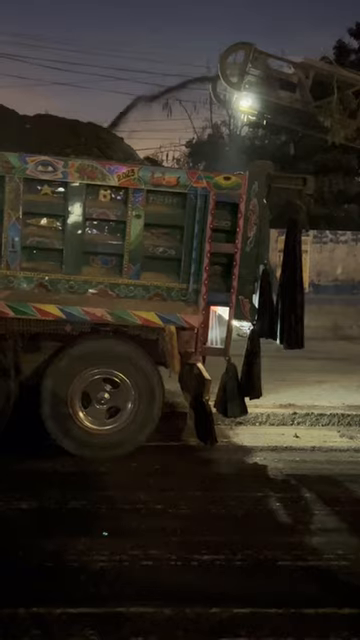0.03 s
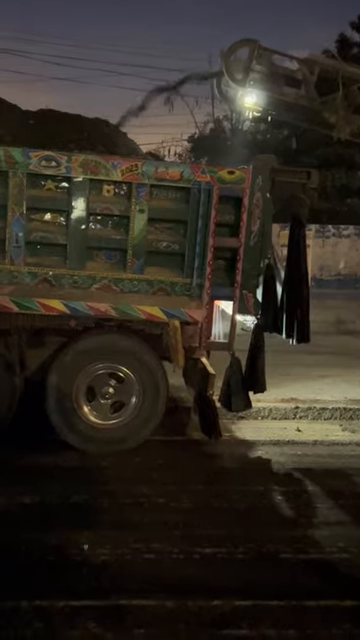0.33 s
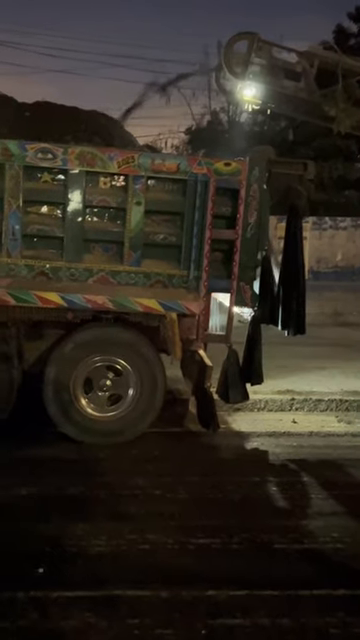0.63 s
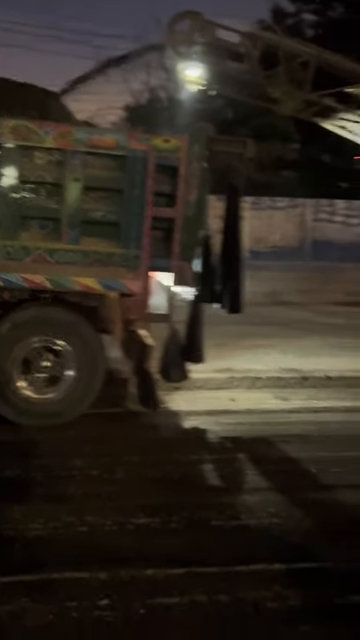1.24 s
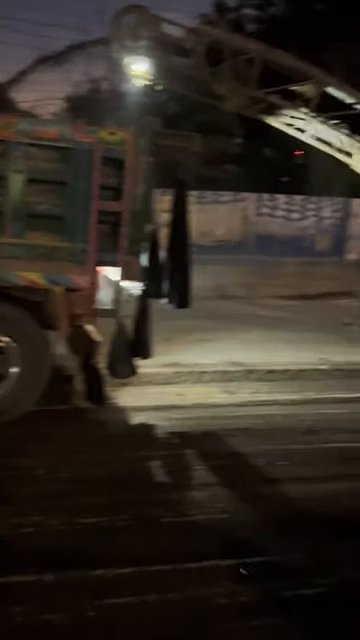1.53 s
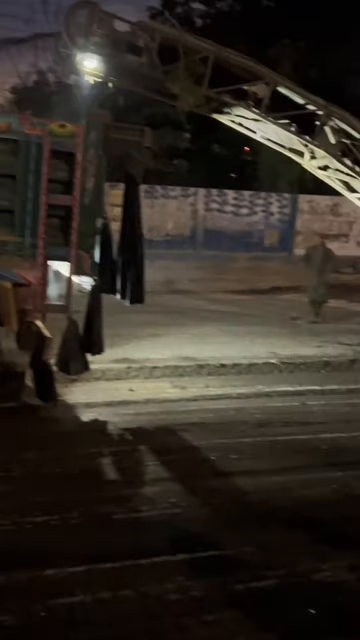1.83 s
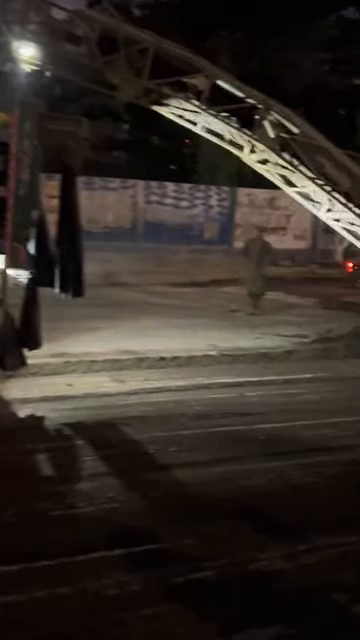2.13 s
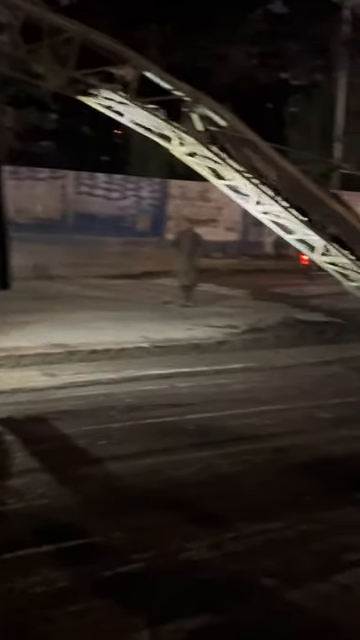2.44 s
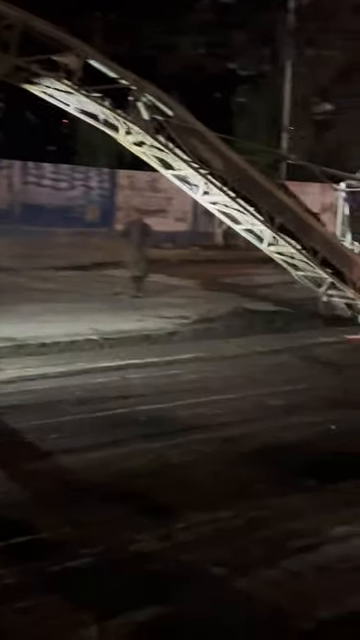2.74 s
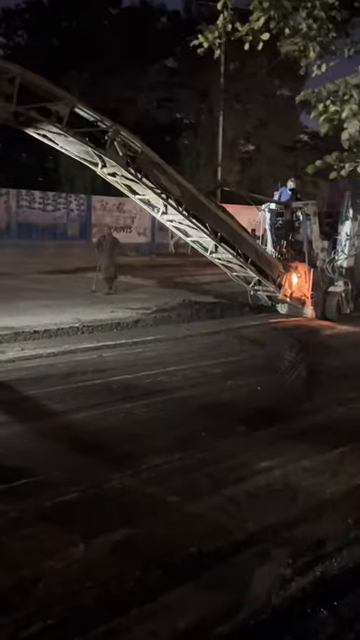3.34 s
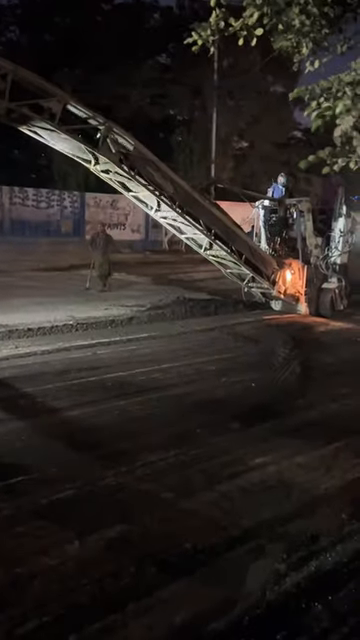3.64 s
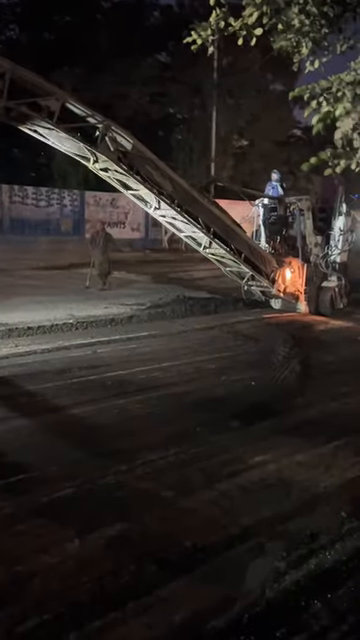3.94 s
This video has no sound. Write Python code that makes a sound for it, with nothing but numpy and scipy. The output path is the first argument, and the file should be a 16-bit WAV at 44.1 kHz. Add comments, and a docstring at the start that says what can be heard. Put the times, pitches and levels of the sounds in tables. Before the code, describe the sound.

The deep diesel rumble of a road milling machine runs throughout, heard outdoors from a few metres. An idling truck ticks, loose steel clanks and asphalt pours off a whining conveyor, which squeals midway before the pouring fades.

```python
"""Road milling at night

Roadside, a stereo microphone a few metres from a milling machine and an idling tipper truck.
The mill's six-cylinder diesel drones over the rumble of drum and conveyor, whose drive whines,
scrapes and sings. Milled asphalt rushes and thuds into the truck's body. The truck's slow diesel
ticks in a pattern that repeats every engine cycle, and loose steel clanks."""
import sys
import numpy as np
from scipy import signal
from scipy.fft import rfft, irfft
from scipy.io import wavfile

SR = 44100
rng = np.random.default_rng(int(sys.argv[2]) if len(sys.argv) > 2 else 0)


def waveform_to_disk(signal):
    """Save audio, clipped to [-1, 1], as 16-bit WAV at the path in sys.argv[1]."""
    frames = np.transpose(np.atleast_2d(signal))
    scaled = np.clip(frames, -1, 1) * 32767
    samples = np.round(scaled).astype(np.int16)
    wavfile.write(sys.argv[1], SR, samples)


N = 176400

TRUCK_CYCLE_S = .16995
# bright crack of hard ticks and clanks: f/Hz, relative level/dB
CRACK_SPECTRUM = [(800, -22), (2000, -2), (4500, 3), (8000, -5), (12000, -19.5), (15500, -8)]


def mill_engine(firing_hz=108.86, cylinders=6, wander=.003, order_flutter=.41, order_drift_rad=.82):
    """The exhaust's firing tone, with weaker orders from unequal cylinders."""
    firing_levels = [(0, -19), (.55, -18.5), (.67, -20.5), (.93, -20), (1.16, -19), (1.24, -21.5),
                     (1.44, -23.5), (1.52, -19), (1.75, -20), (2.18, -17), (2.45, -21.5), (2.8, -21.5),
                     (3.4, -23.5), (3.55, -19), (3.68, -23.5), (4, -22)]  # firing tone: t/s, level/dB
    orders = [(3, -41.5), (4, -32), (5, -35.5), (8, -41), (10, -35.5), (12, -36), (15, -39.5), (16, -41.5)]  # engine orders: multiple of the cycle rate, level/dB
    cycle = running_phase(firing_hz * (1 + wander * walk(8.8))) / cylinders
    exhaust = undb(curve(firing_levels)) * (1 + .06 * walk(21)) * np.sin(cylinders * cycle)
    for order, db in orders:
        phase = order * cycle + rng.uniform(0, 2 * np.pi) + order_drift_rad * walk(2.34)
        exhaust += undb(db) * (1 + order_flutter * walk(13)) * np.sin(phase)
    return np.sqrt(2) * exhaust


def drum(shudder_db=2.0, judder_db=.47, grind_db=1.55):
    """The cutting drum and conveyor rumble, growl and grind under an uneven load."""
    rumble_spectrum = [(20, -48), (32, -31), (41, -13), (50, -3), (72, -3.5), (92, -2.5), (108, -6),
                       (135, -1.5), (200, -16), (500, -59)]  # deep rumble of the drum: f/Hz, relative level/dB
    rumble_levels = [(0, -27.5), (.45, -21), (.7, -25.5), (.92, -22), (1.04, -18.5), (1.2, -24),
                     (1.42, -19), (1.55, -28), (1.85, -21), (2.08, -24), (2.3, -20.5), (2.6, -28.5),
                     (3.2, -20.5), (3.55, -23.5), (4, -25)]  # its swells: t/s, level/dB
    growl_spectrum = [(30, -27.5), (95, -23), (140, -2), (190, -1.5), (235, -1.5), (285, -4), (400, -5.5),
                      (520, -13.5), (750, -22.5), (1500, -46.5)]  # growl of the cutting teeth: f/Hz, relative level/dB
    growl_levels = [(0, -23), (.75, -26.5), (1.4, -21.5), (1.6, -24.5), (1.85, -22.5), (2.35, -25),
                    (2.6, -24), (2.9, -25.5), (3.2, -28), (4, -25)]  # its swells: t/s, level/dB
    roar_spectrum = [(40, -36), (200, -6.5), (420, -1.5), (600, -1), (730, -4), (950, -1.5), (1200, -0.5),
                     (1450, -5.5), (1700, -6), (2000, -12.5), (2550, -9), (3200, -13.5), (4400, -18),
                     (7500, -26), (11500, -28), (15500, -42)]  # grinding roar: f/Hz, relative level/dB
    roar_levels = [(0, -30), (1, -29), (2, -30), (2.55, -27.5), (3.1, -26.5), (4, -27)]  # its swells: t/s, level/dB
    rumble = colour(noise() * undb(shudder_db * walk(30)), rumble_spectrum) * undb(curve(rumble_levels))
    growl = colour(noise() * undb(judder_db * walk(37)), growl_spectrum) * undb(curve(growl_levels))
    roar = colour(noise() * undb(grind_db * walk(54)), roar_spectrum) * undb(curve(roar_levels))
    return microphone(rumble + growl + roar)


def asphalt_pour(lumps_db=1.5):
    """Milled asphalt rushes off the belt in lumps."""
    rush_spectrum = [(40, -33), (300, -6), (550, -0.5), (730, -3), (1000, 2), (1400, -6), (1650, -2),
                     (1900, -5.5), (2400, -8.5), (2850, -17), (3300, -13.5), (4500, -24), (7500, -20),
                     (11500, -33), (15500, -42)]  # belt head and falling asphalt: f/Hz, relative level/dB
    rush_levels = [(0, -27), (.7, -28), (1.3, -28.5), (2.1, -28.5), (2.6, -30), (3, -34.5), (4, -37.5)]  # strength of the rush: t/s, level/dB
    rush = colour(noise() * undb(lumps_db * walk(21)), rush_spectrum)
    return microphone(rush, near=True) * undb(curve(rush_levels))


def conveyor_drive(whine_hz=843, rasp_hz=1615, rasp_flutter_db=2.5):
    """Gears whine, the belt rasps, and the conveyor's singing swells to a clear squeal."""
    whine_levels = [(0, -41), (.5, -39.5), (.9, -38), (1.3, -41), (1.7, -47), (2.1, -45), (2.5, -40),
                    (2.9, -52), (4, -52)]  # gear whine: t/s, level/dB
    singing = [(0, 1645, -48), (1.3, 1653, -46), (2.01, 1660, -41), (2.07, 1660, -30), (2.11, 1670, -28.5),
               (2.16, 1680, -36), (2.22, 1695, -33), (2.29, 1705, -33), (2.345, 1700, -26.5),
               (2.39, 1710, -38), (2.45, 1690, -34), (2.57, 1684, -33), (2.65, 1680, -43), (3, 1670, -45),
               (4, 1674, -47)]  # conveyor's singing: t/s, f/Hz, relative level/dB
    rasp_levels = [(0, -47), (.45, -42), (1.3, -47), (2.2, -36), (2.7, -40.5), (4, -50)]  # belt rasp: t/s, level/dB
    whine_phase = running_phase(whine_hz * (1 + .004 * walk(17)))
    whine = np.sqrt(2) * np.sin(whine_phase) * (1 + .45 * walk(15))
    sing_hz = curve(singing) * (1 + .00894 * walk(23.5))
    squeal = np.sqrt(2) * np.sin(running_phase(sing_hz)) * (1 + .4 * walk(30))
    clear = undb(-5.5) * squeal * np.array([[1], [0]])  # mid only, no side
    rough = undb(-2.5) * resonance(sing_hz, width_hz=80)
    sing = (clear + rough) * undb(curve(singing, column=2))
    rasp = resonance(rasp_hz, width_hz=330) * undb(curve(rasp_levels) + rasp_flutter_db * walk(9.8))
    return whine * undb(curve(whine_levels)) + microphone(sing + rasp, near=True)


def belt_scrapes(width_hz=90):
    """The belt scrapes in short bursts, each one rough ring that swells and fades."""
    bursts = [(.345, 0.042, 1570, -28), (0.378, 0.042, 1650, -30), (0.446, .07, 1630, -33.5),
              (0.567, .06, 2540, -37), (.675, 0.044, 2830, -35), (.68, 0.047, 2500, -38),
              (0.687, 0.057, 1660, -36), (0.848, 0.037, 1567, -29.5), (1.02, .05, 1640, -33),
              (1.412, 0.089, 1640, -34), (1.54, 0.03, 1620, -27), (1.732, 0.06, 1647, -29.5),
              (1.864, 0.047, 1680, -33), (2.041, 0.085, 2480, -39), (2.73, 0.056, 1660, -30.5),
              (3.072, .04, 1665, -38)]  # scrapes: t/s, length/s, f/Hz, level/dB
    scraping = np.zeros((2, N))
    smooth = signal.butter(2, width_hz / 2, fs=SR, output="sos")
    for at, length, hz, db in bursts:
        age = np.arange(int(length * SR)) / SR
        slip = signal.sosfilt(smooth, rng.standard_normal((2, 2, SR // 4)))[..., -len(age):]
        phase = 2 * np.pi * hz * age
        ring = unit(slip[0] * np.cos(phase) + slip[1] * np.sin(phase))
        start = int(at * SR)
        scraping[:, start:start + len(age)] += undb(db) * np.sin(np.pi * age / length) * ring
    return microphone(scraping, near=True)


def truck_engine(grit_db=.5, crack_db=-44.5, panel_ring_s=.0055, turn_from_s=1.6, turn_to_s=2.8):
    """Gritty ticks ring the block and steel panels; the panels' mix shifts as the microphone turns."""
    block_spectrum = [(250, -2), (600, 7), (1200, 4), (2200, -5), (3200, -5.5), (4400, -7.5), (6000, -12.5),
                      (8000, -18), (11500, -28), (15500, -39)]  # ring of the engine block: f/Hz, relative level/dB
    block_levels = [(0, -33.5), (.36, -33), (.53, -34), (.7, -37), (.9, -34), (1.35, -34.5), (1.55, -36),
                    (2, -33), (2.7, -39), (3.4, -35), (4, -31)]  # ticking in the block: t/s, level/dB
    # panel modes: f/Hz, width/Hz, level/dB facing the truck, level/dB facing the mill
    panel_modes = [(2110, 90, -42, -52), (2530, 120, -44, -50), (2840, 90, -44, -56), (3415, 90, -51, -51),
                   (4300, 600, -53, -47.5), (5700, 700, -58, -50)]
    ticks = tick_envelope()
    block = colour(noise() * ticks * undb(grit_db * walk(760)), block_spectrum)
    block *= undb(curve(block_levels))
    crack = colour(noise() * ticks ** 2, CRACK_SPECTRUM) * undb(crack_db)  # favours the hardest ticks
    panel_energy = signal.lfilter([1], [1, -np.exp(-1 / (panel_ring_s * SR))], ticks ** 2)
    panels = np.zeros((2, N))
    for hz, width_hz, truck_db, mill_db in panel_modes:
        panels += resonance(hz, width_hz) * undb(curve([(turn_from_s, truck_db), (turn_to_s, mill_db)]))
    return microphone(block + crack + unit(np.sqrt(panel_energy)) * panels, near=True)


def tick_envelope(loud_tick_s=.6935, attack_s=.0016, decay_s=.014, jitter_s=.0007, scatter_db=.6):
    """Injectors and valves tick in turn, in the same strong and weak pattern every cycle; rms 1."""
    accents = [2, -2.5, -8.5, -4, -0.5, -8, -4.5, -9, -4, -3.5, -6, -1]  # twelve evenly spaced ticks of one cycle: relative level/dB
    t = np.arange(N) / SR
    count = len(accents)
    first = -int(loud_tick_s / TRUCK_CYCLE_S + 1) * count
    chance = rng.standard_normal((int(N / SR / TRUCK_CYCLE_S + 2) * count, 2))
    power = np.zeros(N)
    for k, (late, strong) in enumerate(chance, first):
        at = loud_tick_s + k * TRUCK_CYCLE_S / count + jitter_s * late
        span = slice(*np.searchsorted(t, [at, at + TRUCK_CYCLE_S]))
        age = t[span] - at
        burst = np.minimum(age / attack_s, 1) * np.exp(-age / decay_s)
        power[span] += (burst * undb(accents[k % count] + scatter_db * strong)) ** 2
    return unit(np.sqrt(power))


def steel_clanks(ring_s=.018, crack_s=.009):
    """Loose steel clanks, mostly on the truck's hardest ticks: a sharp crack, then a short ring."""
    hits = [(.131, -21, -36), (.6933, -25, -30), (.868, -24, -28), (1.0394, -30, -34), (1.2032, -27, -32),
            (1.5494, -26, -29), (2.0383, -25, -32), (2.3994, -32, -33), (2.5694, -30, -34),
            (2.908, -31, -28), (3.078, -32, -30), (3.4131, -29, -30), (3.8194, -33, -30)]  # clanks: t/s, ring level/dB, crack level/dB
    steel_modes = [(1030, 110, 8), (1320, 200, 1), (1590, 160, -4), (2120, 120, -5), (2520, 90, -3),
                   (2880, 110, -8.5), (3300, 48, -9)]  # ring of the steel: f/Hz, width/Hz, relative level/dB
    t = np.arange(N) / SR
    ring_envelope, crack_envelope = np.zeros((2, N))
    for at, ring_db, crack_db in hits:
        span = slice(*np.searchsorted(t, [at, at + TRUCK_CYCLE_S]))
        age = t[span] - at
        ring_envelope[span] += undb(ring_db) * np.exp(-age / ring_s)
        crack_envelope[span] += undb(crack_db) * np.exp(-age / crack_s)
    f = np.fft.rfftfreq(N, 1 / SR)
    steel = sum(undb(db) / (1 + 2j * (f - hz) / width_hz) for hz, width_hz, db in steel_modes)
    ring = ring_envelope * unit(irfft(rfft(noise()) * steel, N))
    crack = crack_envelope * colour(noise(), CRACK_SPECTRUM)
    return microphone(ring + crack, near=True)


def asphalt_thuds(decay_s=.0066):
    """Heavier lumps land in the truck's body with dull blows that die away quickly."""
    landings = [(1.018, -16), (1.326, -15)]  # lumps landing: t/s, peak level/dB
    thud_spectrum = [(40, -15), (70, -3), (300, -13), (800, -2), (1500, -28), (4000, -40)]  # the struck body: f/Hz, relative level/dB
    t = np.arange(N) / SR
    blows = sum(undb(db) * (t >= at) * np.exp(-np.abs(t - at) / decay_s) for at, db in landings)
    return microphone(colour(noise() * blows, thud_spectrum)) * np.sqrt(np.mean(blows ** 2))


def microphone(pair, near=False):
    """A mid and side pair becomes left and right at two ports; near sound has its own width."""
    widths = [(60, -30, -40), (130, -23, -27), (260, -19, -22), (520, -13, -12), (800, -8, -9),
              (1200, -2.5, -2.5), (1700, -17, -4), (2500, -10, -6), (3200, -5, -4), (4600, -6, -4),
              (6500, -8, -7), (9000, -7.5, -6), (14000, -4, -3.5)]  # side against mid: f/Hz, near level/dB, diffuse level/dB
    left_lead = [(350, 0), (690, .7), (1020, 1.6), (1250, 1.1), (1600, 0), (2300, -.6), (3600, .2),
                 (4600, 0), (6300, -1.2), (14000, -1.5)]  # lead of the left port: f/Hz, phase/rad
    width = undb(across(widths, column=1 if near else 2))
    mid, side = rfft(pair[0]), rfft(pair[1]) * width
    lead = np.exp(1j * across(left_lead) / 2)
    left, right = (mid + side) * lead, (mid - side) / lead
    return irfft(np.array([left, right]) / np.sqrt(1 + width ** 2), N)


def resonance(hz, width_hz):
    """A narrow resonance shaken at random, in two unrelated versions; rms 1."""
    phase = running_phase(hz)
    pair = [walk(width_hz / 2) * np.cos(phase) + walk(width_hz / 2) * np.sin(phase) for _ in range(2)]
    return unit(np.array(pair))


def colour(x, rows):
    """Causal filter with the given response (f/Hz, level/dB); output at rms 1."""
    cepstrum = irfft(np.log(undb(across(rows))), N)
    cepstrum[1:N // 2] *= 2  # fold to minimum phase
    cepstrum[N // 2 + 1:] = 0
    return unit(irfft(rfft(x) * np.exp(rfft(cepstrum)), N))


def curve(rows, column=1):
    """One column of a time table at every sample, joined by straight lines."""
    rows = np.array(rows, float)
    return np.interp(np.arange(N) / SR, rows[:, 0], rows[:, column])


def across(rows, column=1):
    """One column of a frequency table at every bin, on a log axis."""
    rows = np.array(rows, float)
    return np.interp(np.log(np.fft.rfftfreq(N, 1 / SR) + 1e-3), np.log(rows[:, 0]), rows[:, column])


def walk(rate_hz):
    """Smooth random motion up to about rate_hz; rms 1."""
    f = np.fft.rfftfreq(N, 1 / SR)
    return unit(irfft(rfft(rng.standard_normal(N)) / (1 + (f / rate_hz) ** 4), N))


def running_phase(hz):
    """Phase in radians of a steady or changing frequency."""
    return 2 * np.pi * np.cumsum(hz * np.ones(N)) / SR


def noise():
    """Two unrelated white noises."""
    return rng.standard_normal((2, N))


def undb(db):
    """Decibels to gain."""
    return 10 ** (np.asarray(db) / 20)


def unit(x):
    """Scale to rms 1."""
    return x / np.sqrt(np.mean(x ** 2))


def scene(engine_lean_db=.5):
    """Both machines from a few metres away, the midrange leaning to the left."""
    balance = [(60, .4), (200, .7), (380, -.2), (690, .8), (1050, 6.2), (1350, 6.2), (1650, 2.2),
               (2150, 3.6), (3000, -2), (4300, 1.7), (6300, .2), (10000, 0)]  # left over right: f/Hz, level/dB
    milling = drum() + asphalt_pour() + conveyor_drive() + belt_scrapes()
    truck = truck_engine() + steel_clanks() + asphalt_thuds()
    left_right = np.array([[.5], [-.5]])
    leaning = irfft(rfft(milling + truck) * undb(left_right * across(balance)), N)
    return leaning + mill_engine() * undb(left_right * engine_lean_db)


def record(dry, start_s=.036, fade_s=.002, top_hz=15500):
    """The sound opens quickly after a moment of silence, and the top is cut steeply."""
    opening = np.clip((np.arange(N) / SR - start_s) / fade_s, 0, 1)
    lowpass = signal.ellip(10, .1, 90, top_hz, fs=SR, output="sos")
    return signal.sosfilt(lowpass, dry * opening)


dry = scene()
out = record(dry)
waveform_to_disk(out)
```